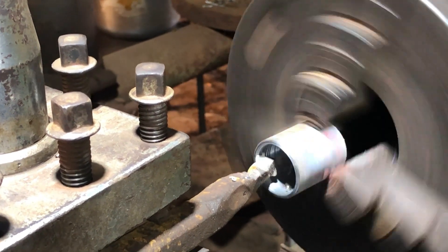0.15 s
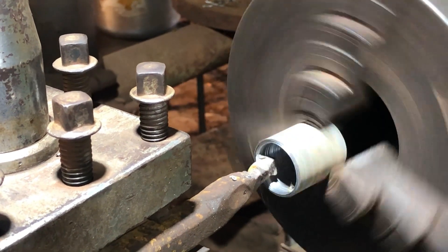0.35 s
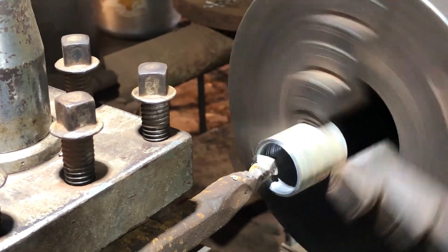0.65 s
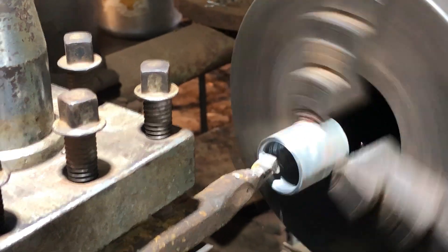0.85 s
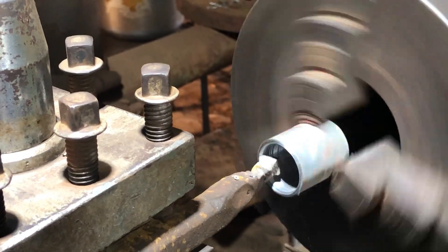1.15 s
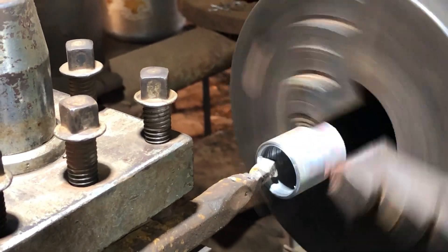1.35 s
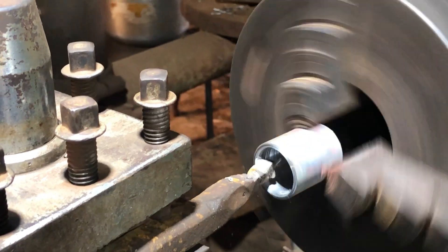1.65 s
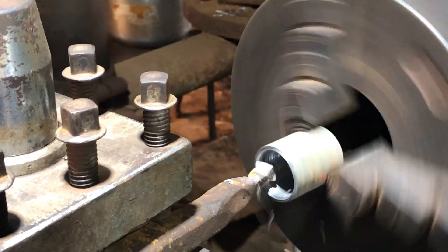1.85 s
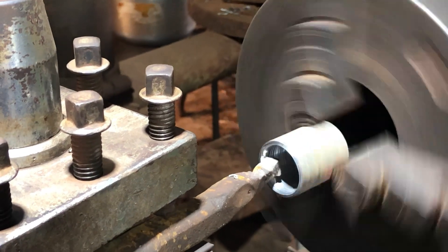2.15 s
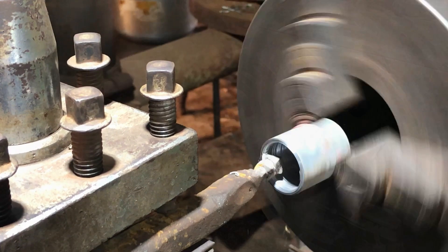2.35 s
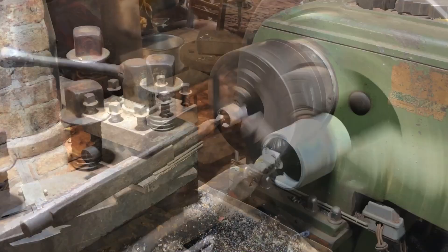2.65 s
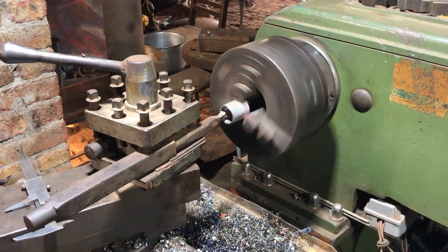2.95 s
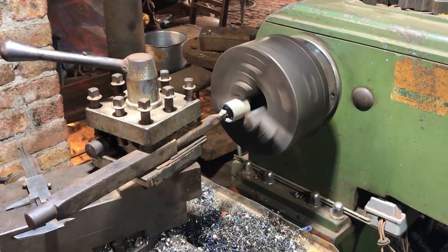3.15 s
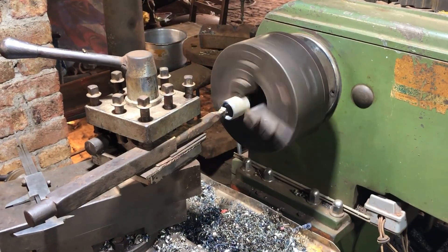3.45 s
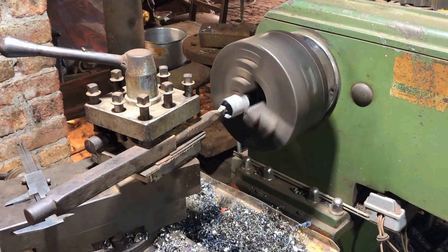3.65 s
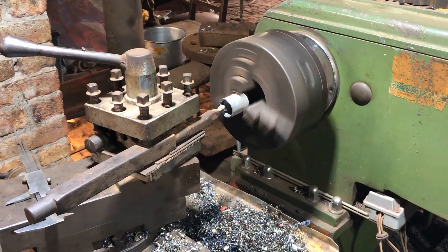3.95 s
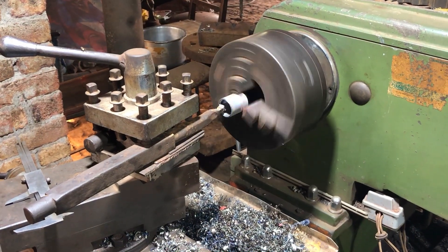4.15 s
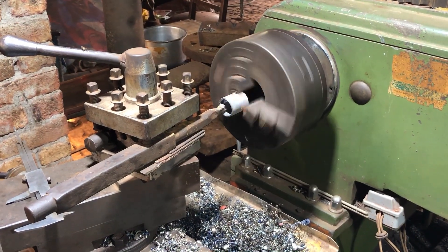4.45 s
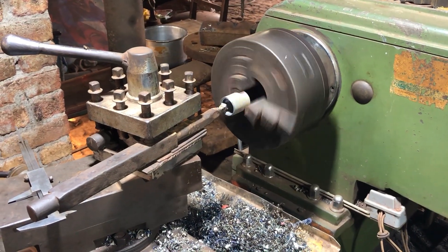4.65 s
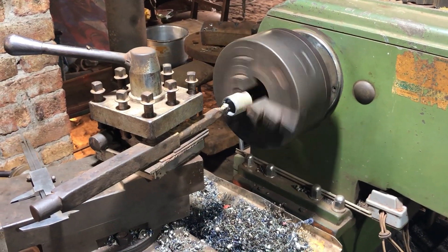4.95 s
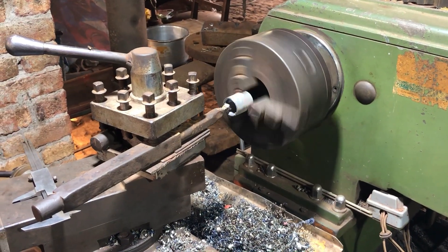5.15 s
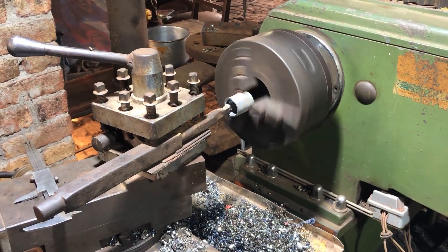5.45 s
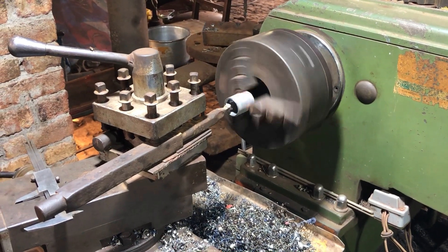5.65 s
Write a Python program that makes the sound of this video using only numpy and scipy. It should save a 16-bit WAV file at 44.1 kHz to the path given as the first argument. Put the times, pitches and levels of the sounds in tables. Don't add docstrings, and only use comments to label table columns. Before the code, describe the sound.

Continuous piercing metallic screech of a boring tool cutting a turning part, wavering several times a second, with faint hissing and motor hum beneath.

```python
import sys
import numpy as np
from scipy import signal
from scipy.fft import rfft, irfft
from scipy.io import wavfile

SR = 44100
rng = np.random.default_rng(int(sys.argv[2]) if len(sys.argv) > 2 else 0)


def transcribe(u):
    v = np.clip(np.atleast_2d(u).T, -1, 1)
    q = np.round(v * 32767).astype(np.int16)
    wavfile.write(sys.argv[1], SR, q)


def volts_from_db(level):
    exponent = np.asarray(level, float) / 20
    return 10 ** exponent


N = 255339
TIME_S = np.arange(N) / SR

CLOSE_TO_FAR_S = (2.196, 2.78)

# time in seconds, pitch in Hz.
BAR_REST = [
    (0, 1335.5),
    (2.4, 1336),
    (4.4, 1336),
    (5.79, 1344),
]
# time in seconds, pitch rise in Hz.
BAR_SWAYS = [(0.147, 13.5), (0.477, 14.1), (0.794, 11.1), (1.101, 4.7), (1.414, 6.6), (1.656, 5.6),
             (1.942, 4.3), (2.284, 8.8), (2.595, 7.7), (2.86, 5.8), (3.191, 10.1), (3.512, 11.7),
             (3.841, 10.6), (4.183, 8.5), (4.539, 5.9), (4.988, 5.5), (5.317, 6.9), (5.507, -12.0),
             (5.619, 10.6)]
# time in seconds, half length in seconds, level change in dB.
BAR_SLIPS = [(0, 0.047, -3), (0.162, 0.023, -3.5), (0.302, 0.018, -5.2), (0.602, 0.0083, -11),
             (0.817, 0.013, -6.5), (0.984, 0.026, -7), (1.296, 0.039, -2), (1.818, 0.025, -10),
             (2.14, 0.04, -1.5), (2.41, 0.067, -4), (2.615, 0.012, -10), (2.766, 0.05, -8),
             (2.986, 0.034, -6.5), (3.225, 0.053, -3.5), (3.365, 0.017, -11), (3.554, 0.031, -2.5),
             (3.69, 0.013, -10), (3.866, 0.036, -4), (4.024, 0.031, -4), (4.216, 0.016, -5),
             (4.356, 0.051, -2.5), (4.73, 0.0085, -6), (5.045, 0.051, -4.5), (5.386, 0.041, -6.5),
             (5.523, 0.035, -3.5), (5.759, 0.021, -3.5)]
BAR_NOTCHES_S = [1.287, 1.347, 2.11, 2.145, 2.401, 2.449, 3.522, 3.577, 3.996, 4.051, 4.4, 5.493]

# time in seconds, level in dB.
TIP_LEVEL = [(0, -29), (.5, -21), (.9, -27.5), (1.1, -25), (1.55, -15.5), (2.15, -17), (2.36, -26.5),
             (2.45, -23), (2.55, -38), (2.65, -21), (2.78, -24.5), (2.95, -16.5), (3.8, -14.5),
             (4.55, -13.5), (5.05, -14.5), (5.5, -18), (5.79, -17)]
# time in seconds, level change in dB.
TIP_BREAKS = [(.135, -6), (.314, -9), (.414, -12), (.514, -7), (.913, -11), (1.003, -13), (1.058, -8),
              (1.452, -10), (2.345, -8), (2.569, -8), (2.779, 1)]
RIPPLE = [(3.98, 0.05), (6.2, 0.02), (8, 0), (9.3, 0.02)]

# time in seconds, level in dB.
SUM_LEVEL = [(0, -14), (.68, -13.5), (1.0, -17.5), (2.1, -15.5), (2.9, -23), (3.2, -19), (3.6, -20),
             (4.2, -17.5), (5.0, -19), (5.79, -21.5)]
# time in seconds, level change in dB.
SUM_BREAKS = [(.454, -8), (.778, -14), (1.407, -5), (1.636, -12), (2.24, -13), (2.429, -9), (2.704, -6),
              (2.883, -17), (3.078, -10), (3.302, -11), (4.375, -6), (4.634, -9), (5.183, -14), (5.248, -8),
              (5.557, -13), (5.692, -12)]
# time in seconds, half length in seconds,
# change of tip plus bar in dB, change of twice tip plus bar in dB.
SLACK = [(0.148, 0.08, -5, -7), (0.447, 0.017, -13, -13), (0.53, 0.018, -3.5, -8.1), (0.795, 0.076, -3, -6),
         (1.063, 0.016, 0.4, -7.5), (1.241, 0.065, 2.7, -9), (1.68, 0.014, -1.4, -9),
         (2.325, 0.082, -3, -8), (2.578, 0.021, -16, -2.2), (2.74, 0.13, -4.9, -3.5),
         (3.004, 0.077, -17, -3), (3.397, 0.07, -11, -7.2), (3.705, 0.057, -20, -10.4),
         (4.018, 0.06, -22, -14), (4.362, 0.064, -7.8, -15), (4.732, 0.04, -8, -8), (5.131, 0.029, 0, -3.8),
         (5.458, 0.015, -3, -5.4), (5.744, 0.024, 4.5, -2.7)]
# time in seconds, level in dB.
OCTAVE_LEVEL = [(0, -29), (.2, -28), (.8, -36), (1.1, -32.5), (1.7, -39), (2.3, -31.5), (3.8, -28),
                (5.1, -29.5), (5.5, -31)]
WEAK_MIXES = [(0, 2, -3), (0, 1, 1), (0, 1, 2), (0, 1, 3), (0, 2, 0), (0, 2, 1), (0, 2, 3), (0, 3, 0),
              (1, 0, 1), (0, 4, 0), (1, 0, 2), (1, 1, -1), (1, 1, 2), (1, 2, 0), (1, 1, 4), (2, -1, 0),
              (1, 3, 0), (1, 4, 0), (1, 5, 0), (2, 2, 0), (2, 3, -2), (3, -1, 0), (2, 3, 0), (1, 7, 0),
              (3, 0, 0), (2, 4, 0), (0, 6, 2), (0, 7, 2)]
# close level in dB, far level in dB.
WEAK_MIX_LEVELS = [(-40, -39), (-43.5, -46.5), (-50, -36), (-46.5, -47), (-34, -37.5), (-60, -37.5),
                   (-37.5, -48.5), (-42, -39.5), (-64, -42), (-35, -35.5), (-38, -46), (-59, -63),
                   (-71, -50), (-29, -32), (-78, -64), (-41, -72), (-31, -33), (-64, -50), (-46, -44),
                   (-42, -42), (-55, -59), (-56, -56), (-34, -38), (-61, -61), (-45, -47), (-43, -46),
                   (-38, -45), (-46, -47)]

# time in seconds, strength in dB.
KNOCKS = [(0.003, 10.5), (0.319, 8.5), (0.615, 10.5), (0.93, 14), (1.235, 12.5), (1.552, 10.5),
          (1.853, 10.5), (2.154, 12.5), (2.465, 6.5), (2.77, 7.5), (3.118, 10), (3.42, 9), (3.729, 11),
          (4.033, 12.6), (4.34, 13), (4.645, 9), (4.943, 6.4), (5.263, 6), (5.567, 8), (0.804, 5),
          (4.169, 5.5), (4.466, 12)]
# time in seconds, half length in seconds, change in dB.
HUM_FADES = [(0.317, 0.033, -15.7), (0.456, 0.045, -11), (0.732, 0.02, -9.7), (1.006, 0.094, -6),
             (1.52, 0.078, -20), (1.822, 0.043, -6.2), (2.023, 0.027, -10.2), (2.796, 0.13, -21),
             (3.46, 0.11, -11), (4.022, 0.025, -5), (4.441, 0.022, -5.1), (4.674, 0.1, -4.6),
             (5.15, 0.031, -15), (5.312, 0.046, -13), (5.56, 0.074, -7)]
# pitch in Hz, width in Hz, close level in dB, far level in dB.
RINGS = [(285.8, 41, -35, -37), (244.7, 51, -42, -43.5), (464, 15.5, -35.5, -47.5), (557.7, 69, -39, -50),
         (2170, 13, -38, -40.5), (3539, 20, -36, -34.5), (2078, 126, -36, -41.5), (6820, 60.0, -63, -43),
         (9590, 44, -54, -47), (10400, 20.0, -60, -46), (11700, 30.0, -50, -56), (14830, 30.0, -62, -58)]
# frequency in Hz, density in dB per Hz.
RUMBLE_SPECTRUM = [(25, -48), (46, -26), (62, -4), (120, -8), (200, -4), (400, -1.5), (800, -5),
                   (1600, -6.5), (2600, -30), (5000, -39)]
# frequency in Hz, density in dB per Hz.
HISS_SPECTRUM = [(1500, -12), (3000, -3), (4500, -2), (6500, 0), (8600, -3), (9300, -7), (11500, -9.5),
                 (13000, -13), (13800, -15), (14000, -23), (14700, -19), (15200, -22), (15300, -30),
                 (15700, -30)]

SPINDLE_HZ, MESH_HZ, HUM_HZ = 3.27, 410.2, 99.1
TIP_CLOSE_HZ, TIP_FAR_HZ = 4852.6, 4850.6
POST_CLOSE_HZ, POST_FAR_HZ = 3524, 3518
SWAY_S, KNOCK_S = 0.05, 0.019
BREAK_S, BAR_NOTCH_DB = 0.0087, -7
FLAT_FIRST_S, FLAT_S, FLAT_DB = 0.32, 0.0094, -3.5
RIPPLE_CREST_S, RIPPLE_WANDER_RAD = 0.029, 0.3
LULL_AT_S, LULL_S, LULL_DB = 2.75, 0.23, -3.0
KNOCK_DB, HUM_DB = -33, -36.5


def curve(rows):
    return np.interp(TIME_S, *np.transpose(rows))


def moved(close, far):
    return np.interp(TIME_S, CLOSE_TO_FAR_S, [close, far])


def by_distance(close_db, far_db):
    return moved(volts_from_db(close_db), volts_from_db(far_db))


def bumps(at_s, half_s, height):
    coarse_s = np.arange(0, N + 40, 40) / SR
    widths_off = (coarse_s[:, None] - np.asarray(at_s)) / np.maximum(half_s, 0.005)
    bells = np.exp(-0.5 * widths_off ** 2)
    return np.interp(TIME_S, coarse_s, bells @ (height * np.ones(len(at_s))))


def breaks(rows):
    at_s, change_db = np.transpose(rows)
    return volts_from_db(bumps(at_s, BREAK_S, change_db))


def rms_one(x):
    return x / np.sqrt(np.mean(x ** 2))


def drift(rate_hz):
    pole = np.exp(-2 * np.pi * rate_hz * 40 / SR)
    noise = rng.standard_normal(N // 40 + 1002)
    slow = signal.lfilter([1], [1, -2 * pole, pole ** 2], noise)[1000:]
    return np.interp(np.arange(N) / 40, np.arange(len(slow)), rms_one(slow))


def phase_of(hz):
    return 2 * np.pi * np.cumsum(hz * np.ones(N)) / SR


def tone(phase, blur, blur_hz, shake=1):
    waver = shake + blur * (drift(blur_hz) + 1j * drift(blur_hz))
    return np.sqrt(2) * np.imag(waver * np.exp(1j * phase)) / np.sqrt(1 + 2 * blur ** 2)


def coloured(spectrum, ripple_db, ripple_hz, patchy_db, patch_hz):
    hz, level_db = np.transpose(spectrum)
    f = np.fft.rfftfreq(N, 1 / SR)
    knots = rng.standard_normal(2000)
    modes_db = ripple_db * np.interp(f / ripple_hz, np.arange(len(knots)), knots)
    slope_db = np.interp(np.log(f + 1), np.log(hz), level_db, -99, -99)
    shaped = rfft(rng.standard_normal(N)) * volts_from_db(slope_db + modes_db)
    half_octave = 2 * np.log2((f + 1) / hz[0])
    together = drift(2.4)
    out = 0
    for k in range(int(2 * np.log2(hz[-1] / hz[0])) + 2):
        band = irfft(shaped * np.clip(1 - np.abs(half_octave - k), 0, 1), N)
        out = out + band * volts_from_db(patchy_db * (0.24 * together + drift(patch_hz)))
    return rms_one(out)


def chatter(lull):
    sway_s, rise_hz = np.transpose(BAR_SWAYS)
    bar_hz = curve(BAR_REST) + bumps(sway_s, SWAY_S, rise_hz)
    bar = phase_of(bar_hz + 2.41 * drift(18.0))
    tip = phase_of(moved(TIP_CLOSE_HZ, TIP_FAR_HZ))
    mesh = phase_of(MESH_HZ)
    squeals = bar_squeal(bar) + tip_squeal(tip)
    return squeals + strong_mixes(tip, bar, mesh) + lull * weak_mixes(tip, bar, mesh)


def bar_squeal(bar):
    notches_db = bumps(BAR_NOTCHES_S, BREAK_S, BAR_NOTCH_DB)
    grip = volts_from_db(bumps(*np.transpose(BAR_SLIPS)) + notches_db + 0.58 * drift(10.3))
    return by_distance(-18.5, -17.5) * grip * tone(bar, 0.13, 40.0)


def tip_squeal(tip):
    flats_s = np.arange(FLAT_FIRST_S, N / SR, 1 / SPINDLE_HZ)
    level = volts_from_db(curve(TIP_LEVEL) + bumps(flats_s, FLAT_S, FLAT_DB)) * breaks(TIP_BREAKS)
    squeal = level * tone(tip, 0.091, 23.0, shake=flutter())
    friction = by_distance(-28.0, -33.0) * tone(tip, 9.0, 36.0)
    return squeal + friction


def flutter():
    turn = phase_of(SPINDLE_HZ) - 2 * np.pi * SPINDLE_HZ * RIPPLE_CREST_S
    gain = 1
    for order, depth in RIPPLE:
        height = np.cos(order * turn + RIPPLE_WANDER_RAD * drift(0.17))
        push = np.cos(order * turn + drift(0.33))
        gain = gain + depth * (height + 0.7j * push)
    return gain


def strong_mixes(tip, bar, mesh):
    slack_s, half_s, sum_db, octave_sum_db = np.transpose(SLACK)
    out = by_distance(-32, -34.5) * tone(tip - bar, 0.3, 40.0)
    sum_gain = volts_from_db(curve(SUM_LEVEL) + bumps(slack_s, half_s, sum_db)) * breaks(SUM_BREAKS)
    out += sum_gain * tone(tip + bar, 0.17, 24.0, shake=flutter())
    close_mode = tip + bar + phase_of(27.0)
    out += by_distance(-27.5, -28.0) * tone(close_mode, 1.7, 28.0)
    out += volts_from_db(curve(OCTAVE_LEVEL) + 0.75 * drift(3.2)) * tone(2 * tip, 0.21, 16.0)
    octave_sum_gain = by_distance(-27, -26.5) * volts_from_db(bumps(slack_s, half_s, octave_sum_db))
    out += octave_sum_gain * tone(2 * tip + bar, 0.3, 31.0)
    out += by_distance(-31.0, -35.0) * volts_from_db(drift(0.9)) * tone(bar - mesh, 0.3, 25.0)
    return out


def weak_mixes(tip, bar, mesh):
    out = 0
    for (m, n, k), (close_db, far_db) in zip(WEAK_MIXES, WEAK_MIX_LEVELS):
        swell = by_distance(close_db, far_db) * volts_from_db(1.8 * drift(6.0))
        blur = 0.36 + 0.083 * (abs(n) + abs(k))
        out = out + swell * tone(m * tip + n * bar + k * mesh, blur, 26.0)
    return out


def knocks():
    at_s, strength_db = np.transpose(KNOCKS)
    swell = bumps(at_s, KNOCK_S, volts_from_db(KNOCK_DB + strength_db))
    return swell * tone(phase_of(moved(POST_CLOSE_HZ, POST_FAR_HZ)), 0.15, 28.0)


def motor_hum():
    return volts_from_db(HUM_DB + bumps(*np.transpose(HUM_FADES))) * tone(phase_of(HUM_HZ), 0.2, 3.1)


def housing_rings():
    out = 0
    for hz, width_hz, close_db, far_db in RINGS:
        out = out + by_distance(close_db, far_db) * tone(phase_of(hz), 21.0, width_hz)
    return out


def chip_hiss():
    noise = coloured(HISS_SPECTRUM, ripple_db=2.5, ripple_hz=28.5, patchy_db=0.77, patch_hz=25.0)
    return by_distance(-22.5, -24.5) * noise


def machine_rumble():
    noise = coloured(RUMBLE_SPECTRUM, ripple_db=2.4, ripple_hz=38.54, patchy_db=0.76, patch_hz=7.9)
    return by_distance(-27.5, -30) * noise


def scene():
    lull = volts_from_db(bumps([LULL_AT_S], LULL_S, LULL_DB))
    tones = chatter(lull) + knocks() + motor_hum() + housing_rings()
    noise = lull * (chip_hiss() + machine_rumble())
    return np.tile(tones + noise, (2, 1))


def roll_off(x):
    return signal.sosfilt(signal.butter(12, 15660, fs=SR, output="sos"), x)


def record(dry):
    held = dry / (1 + (dry / 0.98) ** 8) ** (1 / 8)
    return roll_off(held)


dry = scene()
out = record(dry)
transcribe(out)
```